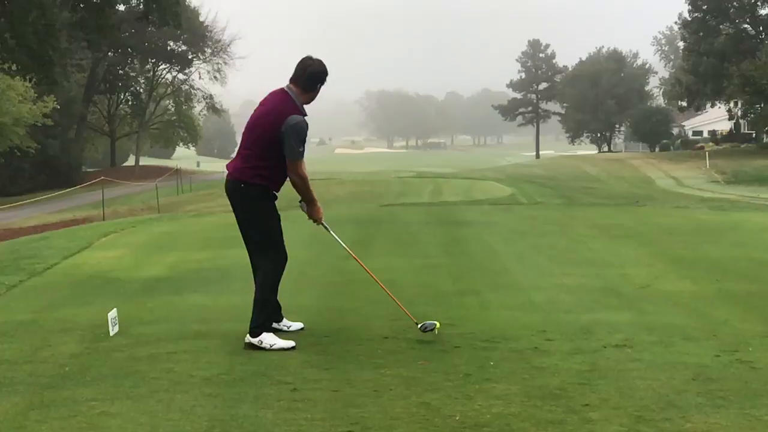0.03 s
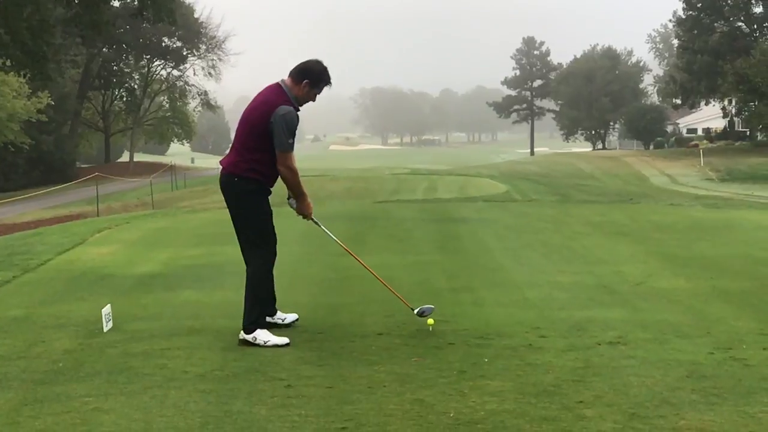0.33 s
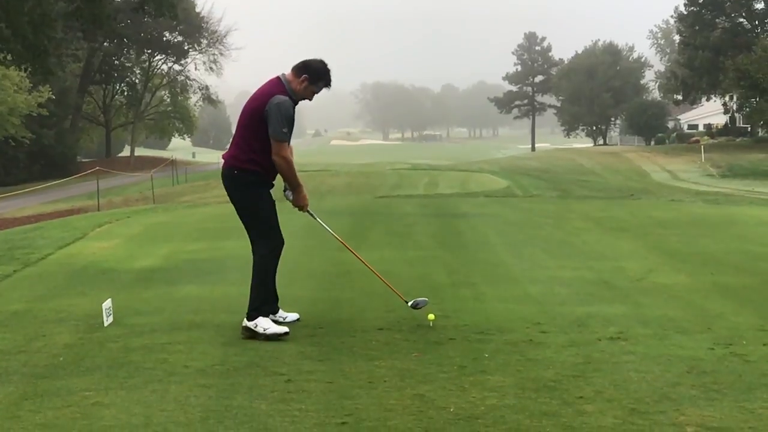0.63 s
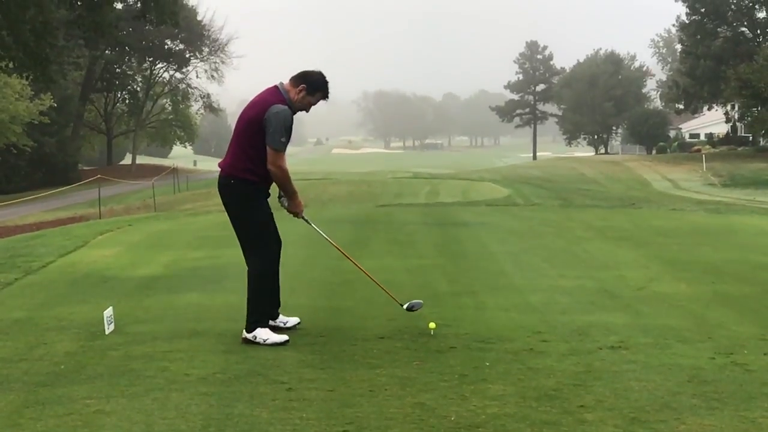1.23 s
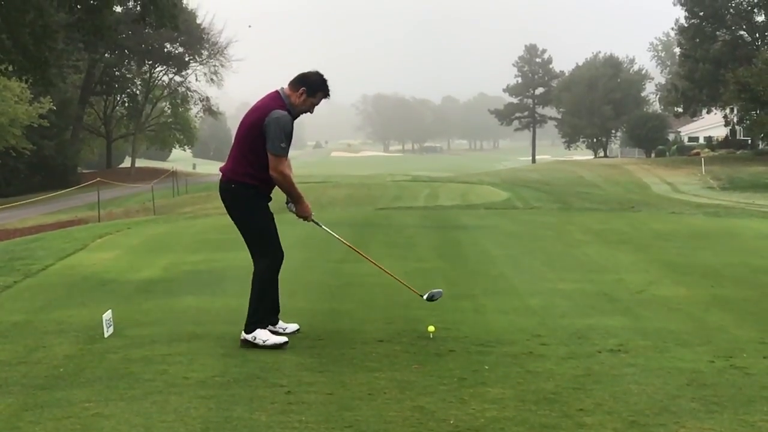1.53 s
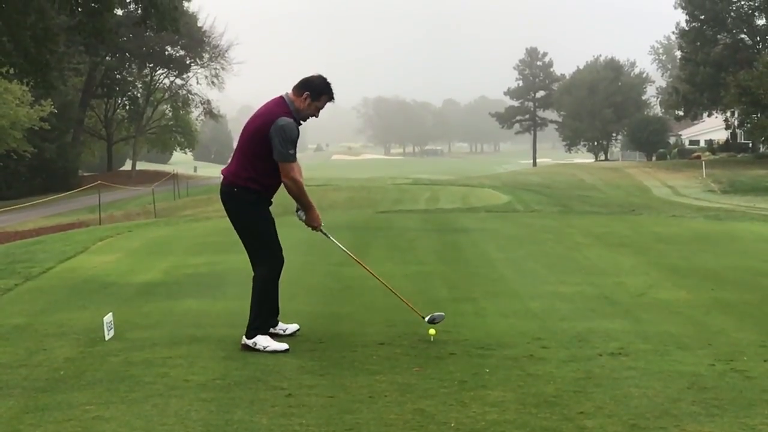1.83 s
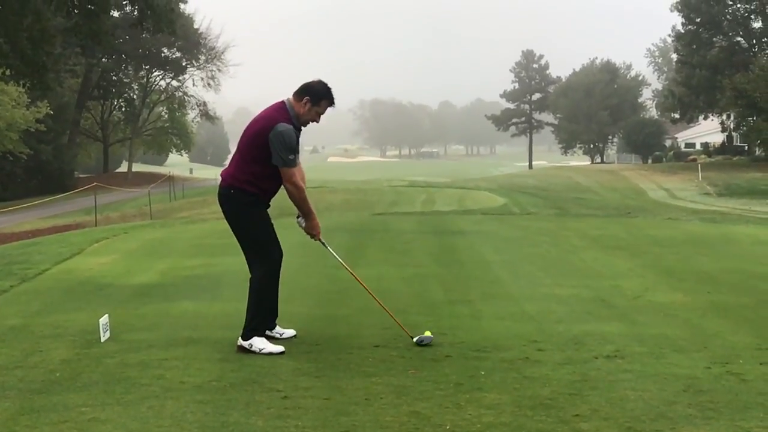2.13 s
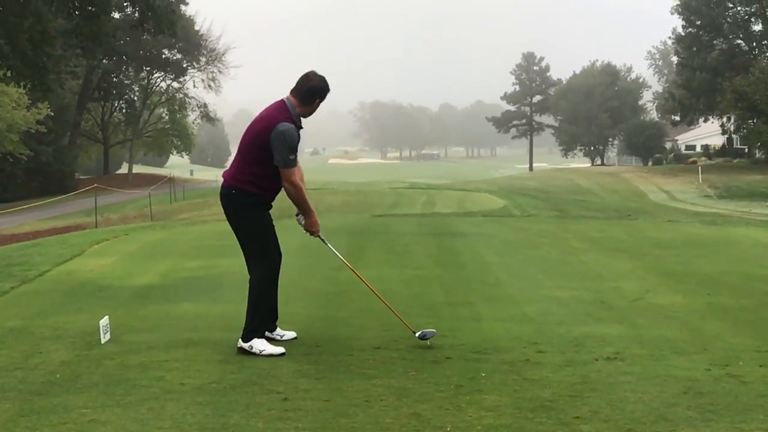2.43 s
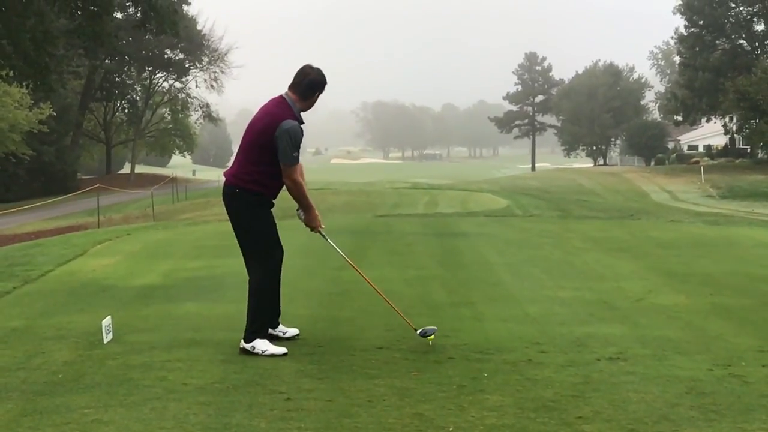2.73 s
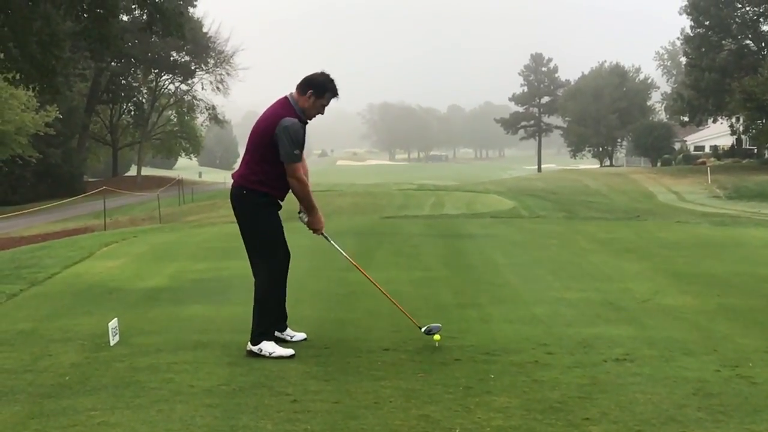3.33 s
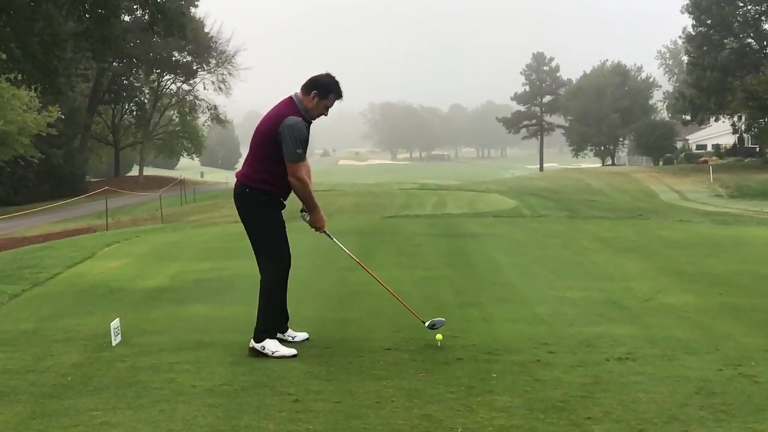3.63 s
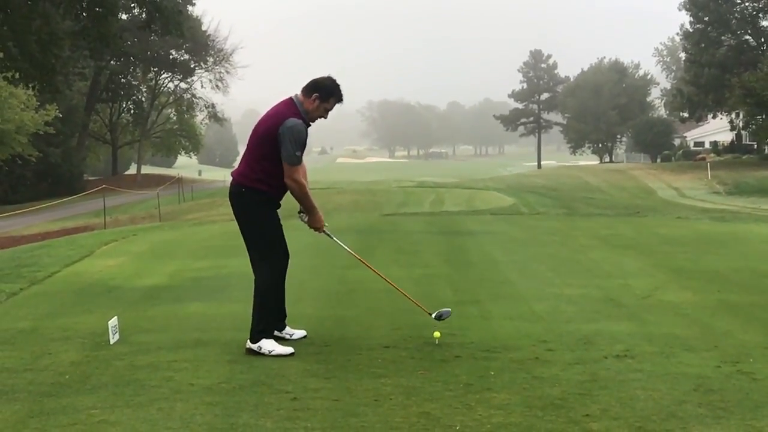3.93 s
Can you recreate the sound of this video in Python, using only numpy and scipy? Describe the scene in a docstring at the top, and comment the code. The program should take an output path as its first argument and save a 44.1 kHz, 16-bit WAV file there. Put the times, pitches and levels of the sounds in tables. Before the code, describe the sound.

Quiet open-air background, with low rumbling air, a far mower-like hum and a thin insect buzz. Scattered birds chirp, the nearest whistles two syllables as wind brushes the microphone, then a farther bird sings five quick falling notes.

```python
"""A still, misty morning on a golf course. After a moment of silence, a far engine, probably a mower,
throbs and slowly fades under a low rumble of air, while insects keep up a thin high band.
Small birds chirp from about 0.8 s. Near 2.7 s the nearest bird whistles two syllables and a soft
puff of wind touches the microphone. From about 3.3 s a farther bird sings five quick falling notes.
The trees send a faint echo of every bird back."""
import sys
import numpy as np
from scipy import signal
from scipy.fft import rfft, irfft
from scipy.io import wavfile

SR = 44100
rng = np.random.default_rng(int(sys.argv[2]) if len(sys.argv) > 2 else 0)


def put_to_file(sound):
    """Save the sound as 16-bit audio at rate SR, in the file named by the first command-line argument."""
    columns = np.atleast_2d(sound).T  # one column per channel
    safe = np.clip(columns, -1, 1)
    whole_steps = np.round(safe * 32767)
    wavfile.write(sys.argv[1], SR, whole_steps.astype(np.int16))


N = 176400
TIME = np.arange(N) / SR


def amp(db):
    """Turns decibels into a number to multiply a sound by."""
    return 10 ** (np.asarray(db) / 20)


def noise(shape):
    """Noise with an average (rms) level of 1; shape(hz) says how strong each frequency is."""
    spectrum = rfft(rng.standard_normal(N)) * shape(np.fft.rfftfreq(N, 1 / SR))
    sound = irfft(spectrum, N)
    return sound / np.sqrt(np.mean(sound ** 2) + 1e-30)


def coloured(points):
    """Noise whose spectrum follows a line through (Hz, dB) points."""
    hz, db = np.transpose(points)
    return noise(lambda f: amp(np.interp(np.log(f + 1), np.log(hz), db)))


def band(centre_hz, width_hz):
    """Noise that is strongest at one frequency and fades to either side."""
    return noise(lambda f: np.exp(-.25 * ((f - centre_hz) / width_hz) ** 2))


def wander(rate_hz):
    """A smooth random wobble, up to about the given rate."""
    return noise(lambda f: (f > 0) * np.exp(-(f / rate_hz) ** 2))


def tone(hz):
    """A pure tone that follows a pitch curve."""
    return np.sqrt(2) * np.sin(2 * np.pi * (np.cumsum(hz) / SR + rng.random()))


def add(mix, start_s, sound):
    """Mixes a sound in at its start time."""
    part = mix[round(start_s * SR):][:len(sound)]
    part += sound[:len(part)]


# Faint high tones. Each row: pitch in Hz, level in dB.
THIN_TONES = [(2995, -96.5), (3994, -95), (4290, -99.5), (5991, -92), (6100, -99), (6989, -96.5),
              (7988, -100.5), (8986, -98), (9985, -99), (10983, -99), (11982, -99), (12980, -100)]

def high_tones():
    """Thin, nearly steady tones just above the hiss."""
    return sum(amp(db) * tone(hz + 3 * wander(8)) for hz, db in THIN_TONES)


# How loud the haze is. Each row: time in seconds, level in dB.
HAZE_LEVELS = [(0, -84), (2.0, -82.5), (2.9, -90), (3.35, -78), (4, -84)]

def haze():
    """A soft hiss that dips, then swells under the farther bird."""
    seconds, db = np.transpose(HAZE_LEVELS)
    return band(centre_hz=2740, width_hz=760) * amp(np.interp(TIME, seconds, db))


# The low rumble and the distant wash. Each row: frequency in Hz, relative level in dB.
RUMBLE_SPECTRUM = [(18, -42), (26, -23.5), (40, -5.5), (65, 1), (100, -2), (140, -3), (190, -11.5),
                   (240, -8), (265, -13), (295, -11.5), (315, -17), (345, -13.5), (450, -26.5),
                   (800, -49.5)]
WASH_SPECTRUM = [(200, -4), (500, -1.5), (750, -2), (1150, 1), (1600, -3), (2000, -6), (2450, -7.5),
                 (3000, -12), (4400, -13.5), (6500, -17.5), (7200, -21), (7700, -23.5), (9000, -21),
                 (9900, -25), (10400, -32), (11000, -24.5), (15500, -24)]
# Puffs of wind. Each row: time of the peak in seconds, width in seconds, level in dB.
WIND_PUFFS = [(2.778, 0.051, -47.5), (3.58, 0.092, -63)]

def air():
    """Air rumbles, wind puffs softly at the microphone, and the distance adds a smooth hiss."""
    rumble = coloured(RUMBLE_SPECTRUM) * amp(-56 + .7 * wander(7.1))
    puff_level = sum(amp(db) * np.exp(-((TIME - peak) / width) ** 2) for peak, width, db in WIND_PUFFS)
    puffs = puff_level * band(centre_hz=46.4, width_hz=11)
    wash = coloured(WASH_SPECTRUM) * amp(-66.5 + .7 * wander(12))
    return rumble + puffs + wash


def insects():
    """Many far insects merge into one fluttering band."""
    return band(centre_hz=5320, width_hz=232) * amp(-75 + wander(45))


# The engine's low tones and its higher whine. Each row: pitch in Hz, level in dB at the start.
THROB_TONES = [(53.4, -68.5), (59.95, -50), (72.75, -62), (85.55, -63), (106.15, -70), (231, -76.5),
               (343, -80)]
WHINE_TONES = [(460, -85), (576, -88.5), (689, -83.5), (829, -79.5), (1045, -87)]

def engine():
    """Low tones beat against each other and slowly fade, while a whine wavers above them."""
    throb_boost_db, fade_db_per_s = 3, 1.15
    speed = 1 + .002 * wander(1.45)
    throb = sum(amp(db + 1.2 * wander(6.6)) * tone(hz * speed) for hz, db in THROB_TONES)
    whine = sum(amp(db + 1.6 * wander(3.5)) * tone(hz * (1 + .0014 * wander(6)))
                for hz, db in WHINE_TONES)
    return throb * amp(throb_boost_db - fade_db_per_s * TIME) + whine


def reflections(decay_s, delay_s):
    """Random little echoes, about 2000 a second, that die away by 60 dB in decay_s."""
    t = TIME[:SR]
    echoes = rng.standard_normal(SR) * (rng.random(SR) < 2000 / SR)
    echoes *= amp(-60 * t / decay_s) * (t > delay_s)
    return echoes / (np.linalg.norm(echoes) + 1e-12)


def trees(sound, direct_db, scatter_db, echo_db):
    """Nearby trunks and leaves scatter each note quickly; the far tree line adds a long faint tail."""
    scatter = amp(scatter_db) * reflections(decay_s=.12, delay_s=.003)
    echo = amp(echo_db) * reflections(decay_s=.97, delay_s=.088)
    return amp(direct_db) * sound + signal.fftconvolve(sound, scatter + echo)[:N]


def whistle(hz, db, octave_db, rasp):
    """A bird's note: a fluttering tone with a weaker one an octave up; rasp shakes its pitch."""
    flutter_db, fade_s = 2.4, .005
    t = np.arange(len(hz)) / SR
    hz = hz * (1 + .085 * rasp * wander(308)[:len(hz)])
    level = amp(db + flutter_db * wander(111)[:len(hz)])
    fades = np.clip(np.minimum(t, t[-1] - t) / fade_s, 0, 1)
    octave_fits = 2 * hz < SR / 2  # the sample rate cannot carry anything higher
    return fades * level * (tone(hz) + amp(octave_db) * tone(2 * hz) * octave_fits)


# Falling notes. Each row: start and length in seconds, first and last pitch in Hz, level in dB.
FALLING_NOTES = [(3.26, .026, 2690, 1920, -67.5), (3.386, 0.025, 3490, 2200, -63.5),
                 (3.501, .024, 4260, 2600, -69.5), (3.647, 0.0305, 2550, 2065, -67),
                 (3.796, 0.032, 2630, 1974, -66.5)]

def farther_bird():
    """A run of quick whistles, each sliding down in pitch."""
    out = np.zeros(N)
    for start, length, first, last, db in FALLING_NOTES:
        pitch = np.geomspace(first, last, round(length * SR))
        add(out, start, whistle(pitch, db, octave_db=-25, rasp=.43))
    return out


# Chirps. Each row: start and length in seconds, first, middle and last pitch in Hz,
# relative level in dB, the octave's level in dB compared with the note, rasp from 0 to 1.
BIRD_CHIRPS = [(0.771, 0.022, 5560, 7100, 7600, -68.5, -7, 0.1),
               (1.03, .016, 13200, 13900, 15100, -76, -40, .9),
               (1.253, 0.036, 2980, 3780, 4450, -72, -25, 0.5),
               (1.302, .06, 4350, 3820, 3230, -72, -27, .9), (1.55, .038, 6200, 7000, 7300, -72, -25, 0.26),
               (2.208, 0.034, 3840, 4470, 4600, -71, -23, 0.24),
               (2.243, 0.036, 4570, 4200, 3800, -68, -25, 0.97),
               (2.499, 0.045, 3050, 2900, 2800, -77, -34, .1),
               (2.625, .042, 9300, 8830, 9400, -72, -40, 0.07),
               (2.895, .04, 3400, 4200, 4530, -73.5, -30, 0.8),
               (2.939, .06, 4550, 4050, 3490, -70.5, -27, 1),
               (3.195, 0.041, 7300, 7450, 7500, -77.5, -28, .25),
               (3.975, .03, 8800, 7400, 6800, -78, -23, .15)]
# The nearest bird, one list per syllable. Each row: time in seconds, pitch in Hz, relative level in dB.
SONG_SYLLABLES = [
    [(2.685, 5050, -73), (2.704, 4650, -62), (2.716, 5100, -66), (2.728, 4790, -59), (2.748, 4760, -60.5),
     (2.76, 4650, -74)],
    [(2.773, 7400, -84), (2.788, 6300, -69), (2.8, 6000, -66), (2.825, 6100, -72), (2.843, 5500, -62),
     (2.87, 5450, -75), (2.89, 5680, -59.5), (2.91, 6150, -68), (2.95, 6350, -70.5), (2.995, 6700, -75)],
]

def near_birds():
    """Small birds chirp, bending each note through three pitches; the nearest whistles two syllables."""
    out = np.zeros(N)
    for start, length, first, middle, last, db, octave_db, rasp in BIRD_CHIRPS:
        curve = np.polyfit([0, .5, 1], [first, middle, last], 2)
        pitch = np.polyval(curve, np.linspace(0, 1, round(length * SR)))
        add(out, start, whistle(pitch, db, octave_db, rasp))
    for syllable, octave_db in zip(SONG_SYLLABLES, (-15, -20)):
        seconds, hz, db = np.transpose(syllable)
        t = np.arange(seconds[0], seconds[-1], 1 / SR)
        note = whistle(np.interp(t, seconds, hz), np.interp(t, seconds, db), octave_db, rasp=.15)
        add(out, seconds[0], note)
    return out


def scene():
    """The background and the birds among the trees, all at one microphone."""
    near = trees(near_birds(), direct_db=-2.5, scatter_db=-6, echo_db=-9)
    far = trees(farther_bird(), direct_db=0, scatter_db=-10, echo_db=-9)
    return (engine() + air() + high_tones() + insects() + haze() + near + far)[None]


def record(dry):
    """The sound begins after a moment of silence, and the very highest treble is cut off."""
    silence_s, fade_in_s, cutoff_hz = .083, .002, 15720
    fade_in = np.clip((TIME - silence_s) / fade_in_s, 0, 1)
    treble_cut = signal.firwin(801, cutoff_hz, window=("kaiser", 8), fs=SR)
    return signal.oaconvolve(dry * fade_in, treble_cut[None], "same")


dry = scene()
out = record(dry)
put_to_file(out)
```